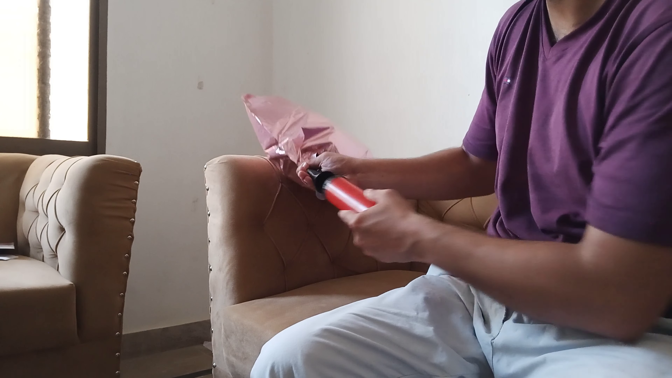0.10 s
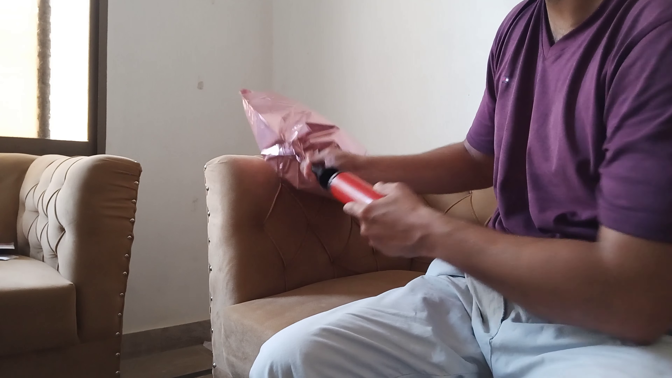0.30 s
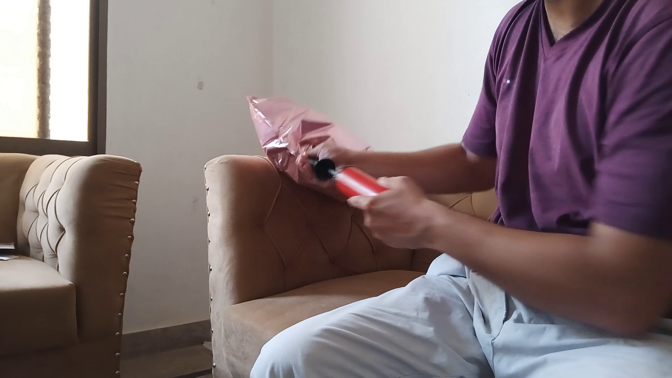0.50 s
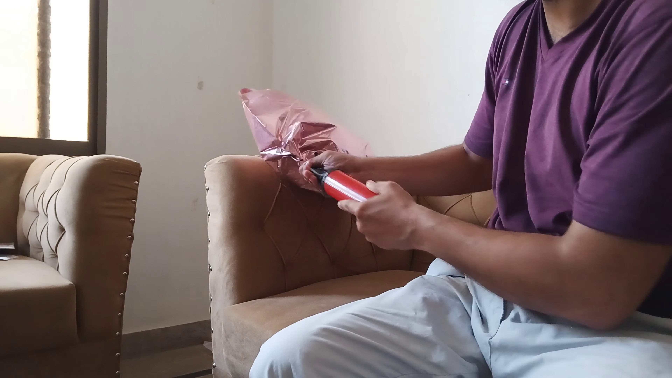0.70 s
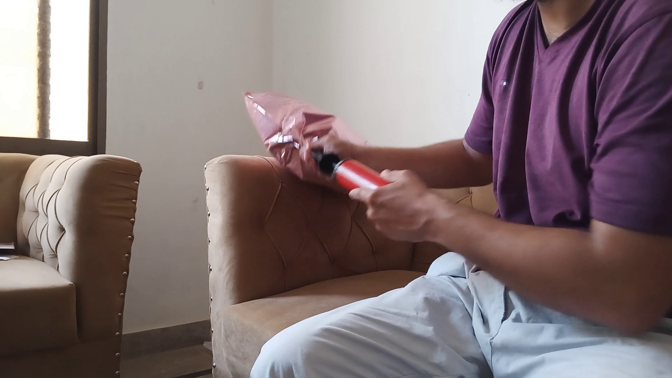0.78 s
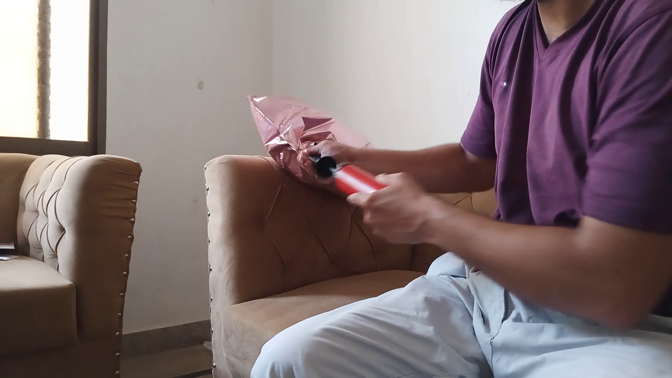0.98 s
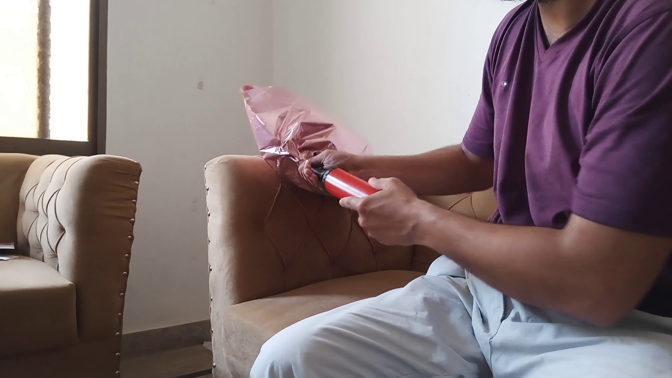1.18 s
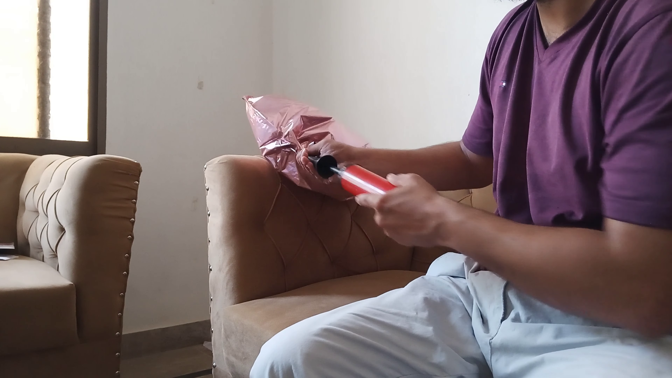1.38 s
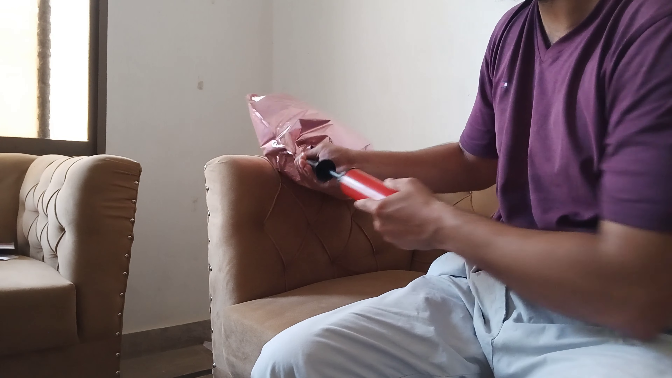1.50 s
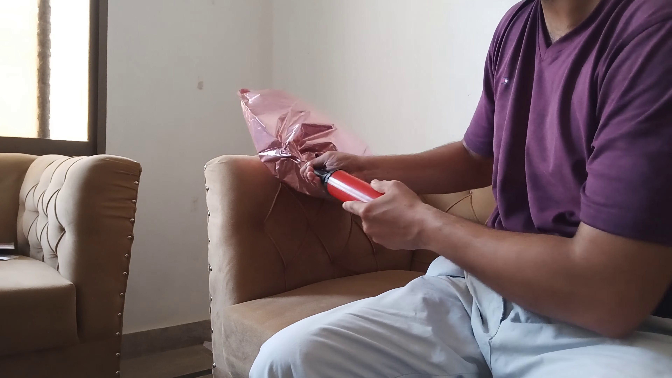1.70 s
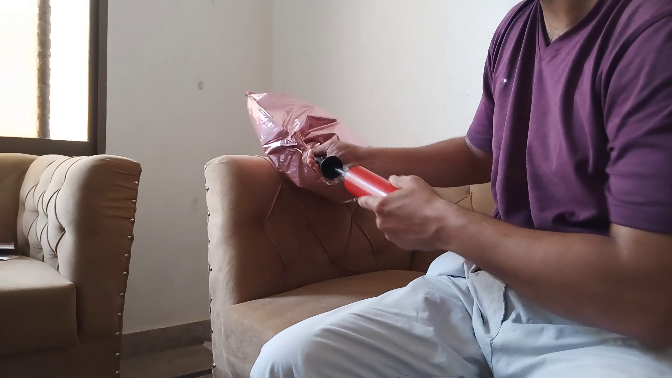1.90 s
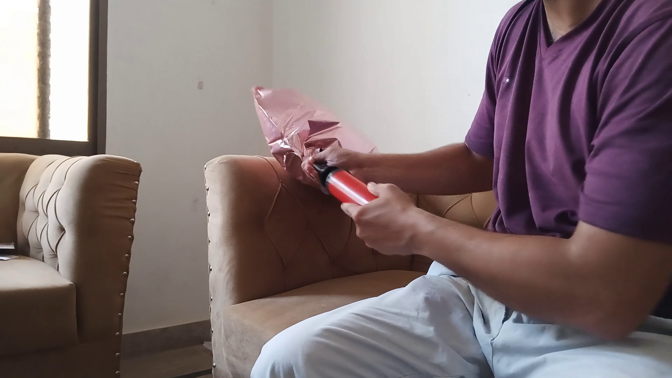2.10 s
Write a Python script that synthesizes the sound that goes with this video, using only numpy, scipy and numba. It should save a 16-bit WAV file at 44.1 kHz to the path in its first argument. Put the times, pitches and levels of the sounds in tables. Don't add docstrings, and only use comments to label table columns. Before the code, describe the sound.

A plastic hand pump inflates a balloon in a quiet living room, a metre from a phone microphone. An intake hiss ends with a hard knock at 0.16 s. Bright, hollow air jets with low puffs burst at 0.2, 0.7, 1.2 and 1.7 s, each about a quarter second, the first strongest. Softer sucking hisses, seal scrapes, knocks and valve ticks fill the turns; a stronger pull and dull bump follow near 2.1 s.

```python
import sys
import numpy as np
from scipy import signal
from scipy.fft import rfft, irfft
from scipy.io import wavfile
from scipy.ndimage import uniform_filter1d
from numba import njit

SR = 44100
rng = np.random.default_rng(int(sys.argv[2]) if len(sys.argv) > 2 else 0)


def persist_wave(psi):
    counts = np.round(np.clip(psi, -1, 1) * 32767).astype(np.int16)
    wavfile.write(sys.argv[1], SR, np.atleast_2d(counts).T)


def convert_level_to_amplitude(level_db):
    exponent = np.asarray(level_db, float) / 20
    return 10 ** exponent


N = 94815

# t/s, jet level/dB
PUSH_STROKES = [
    [(.213, -50), (.221, -23), (.231, -15.5), (.26, -11), (.295, -12.5), (.33, -14.5), (.39, -27.5),
     (.44, -46), (.46, -58)],
    [(.700, -61), (.708, -22), (.724, -14.5), (.76, -13), (.795, -14), (.83, -15.5), (.91, -37), (.95, -38),
     (.97, -58)],
    [(1.208, -42), (1.218, -23.5), (1.232, -17.5), (1.275, -13.5), (1.32, -16), (1.36, -21.5), (1.414, -35),
     (1.424, -73), (1.47, -67)],
    [(1.724, -50), (1.733, -21.5), (1.748, -15.5), (1.785, -14), (1.83, -15.5), (1.86, -23), (1.91, -35.5),
     (1.95, -42), (1.98, -65)],
]
# pitch/ratio, ring level/dB, creep level/dB
BALLOON_NECK = [
    (.78, -2, 5),
    (1.04, 0.8, 2),
    (1.01, 4.5, -2.5),
    (0.806, -7.5, -2.5),
]


def to_level(x, db):
    return x * convert_level_to_amplitude(db) / np.sqrt(np.mean(x ** 2))


@njit
def svf(x, hz, width):
    y, band, low = np.empty(len(x)), 0., 0.
    for i in range(len(x)):
        g, k = np.tan(np.pi * hz[i] / SR), width / hz[i]
        v = (band + g * (x[i] - low)) / (1 + g * (g + k))
        band = 2 * v - band
        low = low + 2 * g * v
        y[i] = k * v
    return y


def still_band(x, hz, width_hz):
    return svf(x, np.full(N, float(hz)), float(width_hz))


def colour(x, spectrum):
    f = np.maximum(np.fft.rfftfreq(N, 1 / SR), 1)
    hz, db = np.array(spectrum).T
    return irfft(rfft(x) * convert_level_to_amplitude(np.interp(np.log(f), np.log(hz), db)), N)


def walk(hz):
    hold = max(int(SR / hz), 1)
    x = np.repeat(rng.standard_normal(N // hold + 1), hold)[:N]
    x = uniform_filter1d(uniform_filter1d(x, hold), hold)
    return x / x.std()


def gas(spit_db, flutter_db):
    flutter_hz = 91.24
    return rng.standard_normal(N) * convert_level_to_amplitude(spit_db * walk(1500) + flutter_db * walk(flutter_hz))


def half_sine(t, start, length):
    return np.sin(np.pi * np.clip((t - start) / length, 0, 1)).clip(0)


def hits(events, modes, push_s):
    scatter_db, push_curve = 1.5, 1.3
    out, t = np.zeros(N + 4096), np.arange(4096) / SR
    onset = np.minimum(t / push_s, 1) ** push_curve
    for s, db, pitch in events:
        ring = np.zeros(4096)
        for hz, mode_db, t60 in modes:
            gain = convert_level_to_amplitude(mode_db + scatter_db * rng.standard_normal())
            ring += gain * np.sin(2 * np.pi * hz * pitch * t) * convert_level_to_amplitude(-60 * t / t60)
        ring *= onset
        i = int(s * SR)
        out[i:i + 4096] += convert_level_to_amplitude(db) * ring / np.abs(ring).max()
    return out[:N]


def hum():
    # f/Hz, level/dB per Hz
    hum_colour = [(30, -38), (62, -4), (150, -2.5), (350, -4.5), (600, -6.5), (800, -8), (1300, -15),
                  (3500, -15), (7000, -60)]
    sway = convert_level_to_amplitude(1.5 * walk(8))
    return sway * to_level(colour(rng.standard_normal(N), hum_colour), -48.5)


def pulls(t):
    # start t/s, length/s, level/dB
    strokes = [
        (-.08, .26, -28),
        (0.389, 0.28, -28),
        (0.901, 0.25, -33),
        (1.413, 0.24, -38.5),
        (1.92, 0.27, -27.5),
    ]
    # f/Hz, level/dB per Hz
    intake_colour = [(290, -14), (500, -30.5), (799, -10), (1100, -15.5), (2250, -9.5), (3690, -9),
                     (6150, -1.5), (8100, -13.5), (13500, -29)]
    sharpness = 1.63
    creep_s, creep_db, leak_db = .03, -30.5, -44.5
    flow = sum(convert_level_to_amplitude(db) * half_sine(t, s, length) ** sharpness for s, length, db in strokes)
    creep = np.zeros(N)
    for rows, neck in zip(PUSH_STROKES, BALLOON_NECK):
        creep += convert_level_to_amplitude(creep_db + neck[2]) * np.exp(-(np.abs(t - rows[1][0]) / creep_s) ** 2)
    hiss = to_level(colour(gas(0.75, 0.91), intake_colour), 0)
    return np.sqrt(flow ** 2 + creep ** 2 + convert_level_to_amplitude(2 * leak_db)) * hiss


def knocks():
    # t/s, level/dB, pitch/ratio
    events = [
        (.1568, -15.5, 1.06),
        (.212, -21, 1.12),
        (.634, -17, .99),
        (1.211, -24, .97),
    ]
    # f/Hz, level/dB, t60/s
    modes = [(1620, 0, .014), (3350, -7, .01), (6000, -17, .006)]
    return hits(events, modes, push_s=.0013)


def scrapes(t):
    # start t/s, length/s, level/dB
    rubs = [
        (.17, .052, -38),
        (.643, .05, -44),
    ]
    rub = to_level(still_band(gas(1.9, 2.5), 1800, 500), 0)
    return rub * sum(convert_level_to_amplitude(db) * half_sine(t, s, length) ** 0.33 for s, length, db in rubs)


def pushes(t):
    # f/Hz, level/dB per Hz
    jet_colour = [(180, -60), (420, -20), (560, -10), (1150, -9), (1700, -7), (3100, -8), (6590, -2.5),
                  (8180, -13.5), (13500, -25.5)]
    # f/Hz, width/Hz, level/dB
    barrel_modes = [(772, 107, -14), (1550, 63, -18.5), (2192, 160, -21.5), (2925, 84, -23),
                    (3476, 48, -14.5), (4070, 76, -18)]
    barrel_rise = 0.22
    barrel_fade_db = -13
    puff_hz, puff_width_hz, puff_db, puff_at, puff_spread = 255, 340, -20, 0.593, 0.16

    db, travel, pitch, ring_db = np.full(N, -90.), np.zeros(N), np.ones(N), np.zeros(N)
    for rows, neck in zip(PUSH_STROKES, BALLOON_NECK):
        s, d = np.array(rows).T
        on = (t >= s[0]) & (t < s[-1])
        db[on] = np.interp(t[on], s, d)
        travel[on] = (t[on] - s[0]) / (s[-1] - s[0])
        pitch[on], ring_db[on] = neck[:2]
    db = uniform_filter1d(db, size=100)

    jet = to_level(colour(gas(1, 1), jet_colour), 0)
    for hz, db_per_db in (7900, 0.03), (13600, .15):
        treble = signal.sosfiltfilt(signal.butter(2, hz, "high", fs=SR, output="sos"), jet)
        jet = jet + (convert_level_to_amplitude(db_per_db * np.minimum(db + 13.5, 0)) - 1) * treble

    swirl = gas(1.1, 1.4)
    climb = pitch * (1 + barrel_rise * (travel - .2))
    ring = sum(to_level(svf(swirl, hz * climb, float(width)), d) for hz, width, d in barrel_modes)
    jet = jet + ring * convert_level_to_amplitude(ring_db + barrel_fade_db * travel)

    puff = still_band(gas(0.98, 2.5), puff_hz, puff_width_hz)
    puff = to_level(still_band(puff, puff_hz, 2 * puff_width_hz), puff_db)
    swell = np.exp(-.5 * ((travel - puff_at) / puff_spread) ** 2)
    return (jet + puff * swell) * convert_level_to_amplitude(db + 1.0)


def bumps():
    # t/s, level/dB, pitch/ratio
    events = [
        (.589, -27, 1.05),
        (1.158, -33, .9),
        (2.127, -27, 1.01),
    ]
    # f/Hz, level/dB, t60/s
    modes = [(210, -5, .04), (520, -2, .015), (900, -2, .011), (1550, -6, .008)]
    return hits(events, modes, push_s=.0012)


def ticks():
    # t/s, level/dB, pitch/ratio
    events = [(.6265, -25, 1.02), (.632, -29, .98), (1.137, -29, .95), (1.149, -25, 1.0),
              (1.166, -31, 1.15), (1.177, -29, 1.03), (1.195, -25, .97), (1.669, -27, 1.0),
              (1.674, -22.5, 1.0), (1.691, -28, .99), (1.694, -29, 1.03), (1.706, -31, 1.0),
              (1.723, -26, 1.05)]
    # f/Hz, level/dB, t60/s
    modes = [(3600, -3, .006), (5500, 0, .008), (6600, -5, .005), (8500, -13, .004), (12000, -22, .003)]
    return hits(events, modes, push_s=.0005)


def room(x):
    t60_s, room_db, dull_hz = 0.31, -12, 7400
    t = np.arange(int(.5 * SR)) / SR
    tail = rng.standard_normal(len(t)) * convert_level_to_amplitude(-60 * t / t60_s) * (t > .004)
    tail = signal.lfilter(*signal.butter(2, dull_hz, fs=SR), tail)
    return signal.fftconvolve(x, tail / np.sqrt(np.sum(tail ** 2)))[:N] * convert_level_to_amplitude(room_db)


def scene():
    t = np.arange(N) / SR
    pump = pulls(t) + knocks() + scrapes(t) + pushes(t) + bumps() + ticks()
    return np.tile(hum() + pump + room(pump), (2, 1))


def roll_off(x):
    return signal.sosfilt(signal.butter(12, 16860, fs=SR, output="sos"), x)


def record(dry):
    x = dry[0] + convert_level_to_amplitude(-6) * still_band(dry[0], 6840, 770)
    top_hz, top_width_hz = 14850, 2300
    top_band = still_band(still_band(x, top_hz, top_width_hz), top_hz, top_width_hz)
    x = x + convert_level_to_amplitude(12.5) * top_band
    x = np.tanh(0.76 * x) / 0.87
    x = signal.sosfilt(signal.ellip(12, .2, 60, 15480, fs=SR, output="sos"), x)
    return roll_off(np.tile(x, (2, 1)))


dry = scene()
out = record(dry)
persist_wave(out)
```